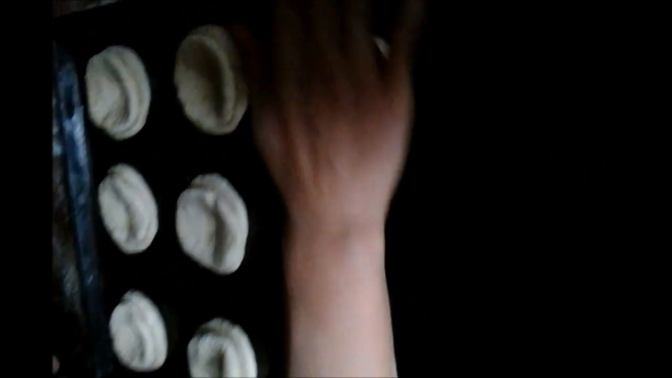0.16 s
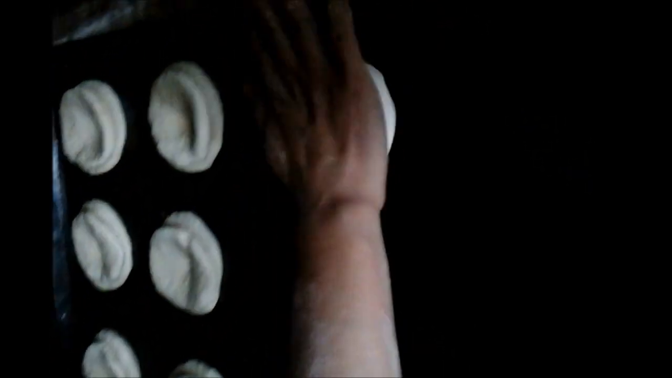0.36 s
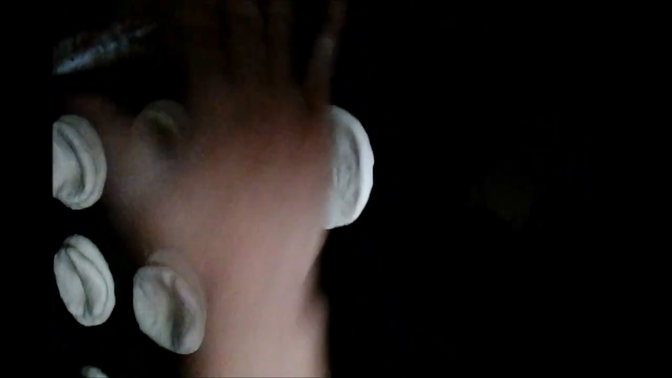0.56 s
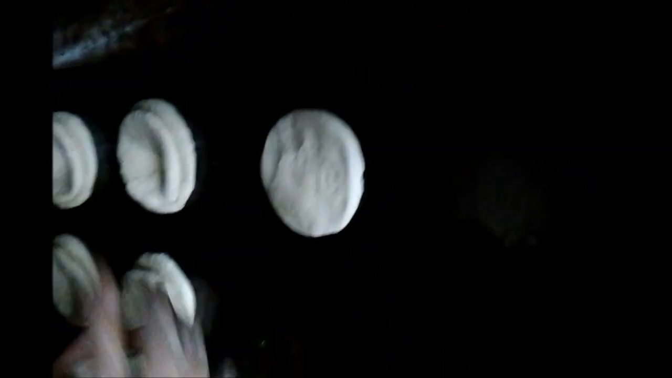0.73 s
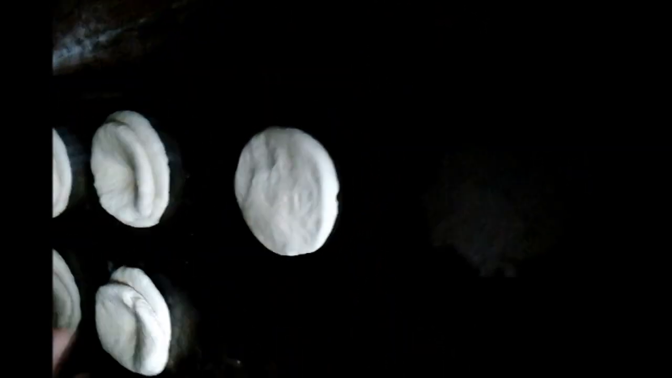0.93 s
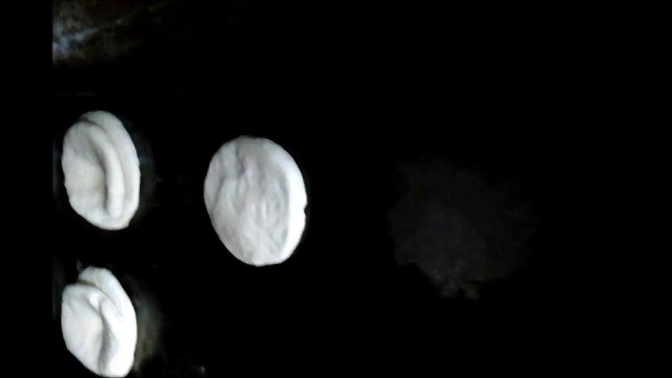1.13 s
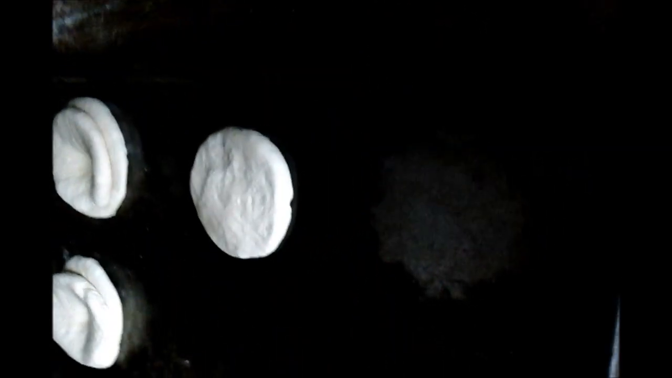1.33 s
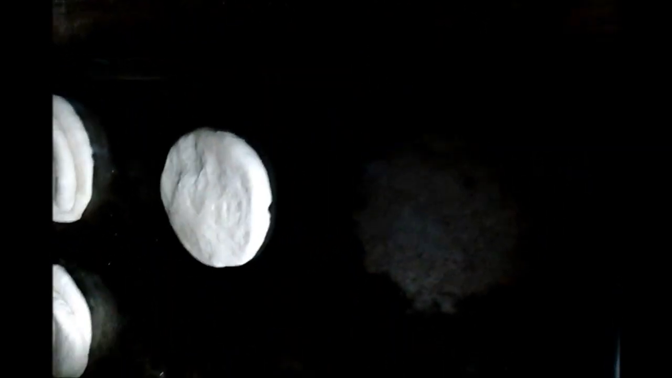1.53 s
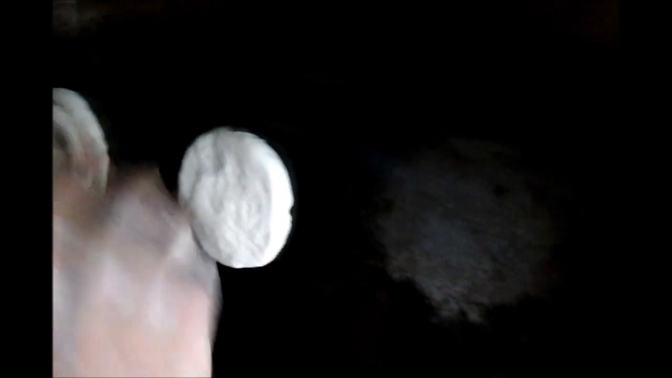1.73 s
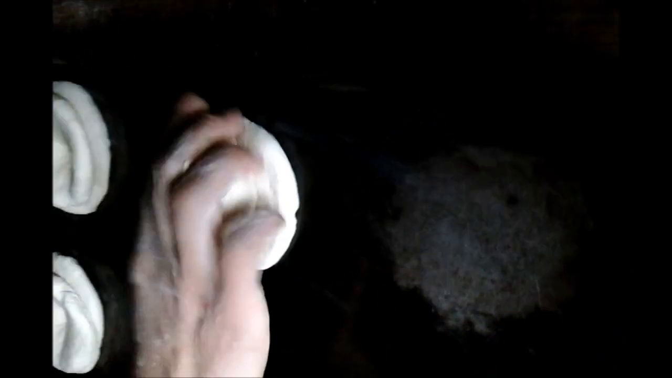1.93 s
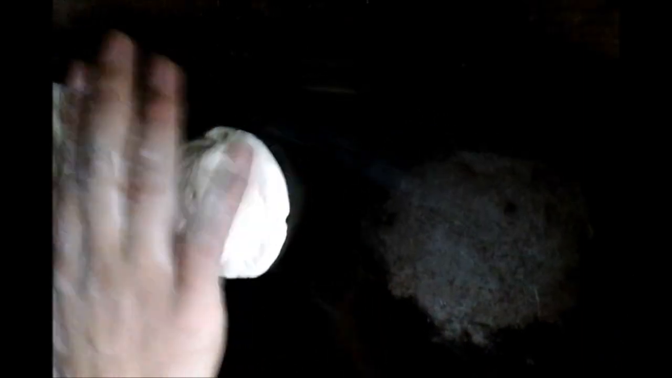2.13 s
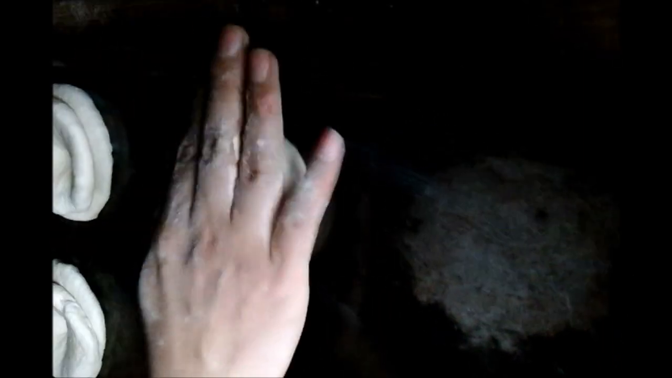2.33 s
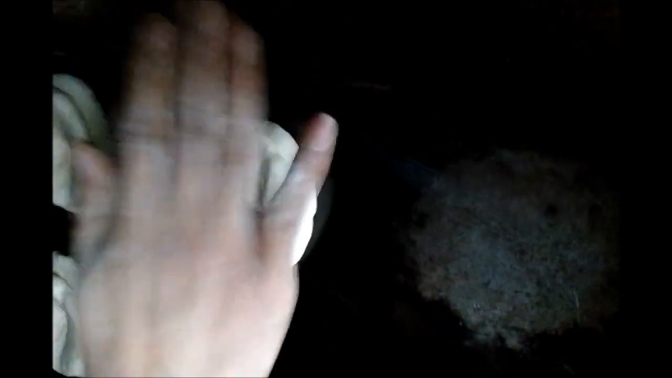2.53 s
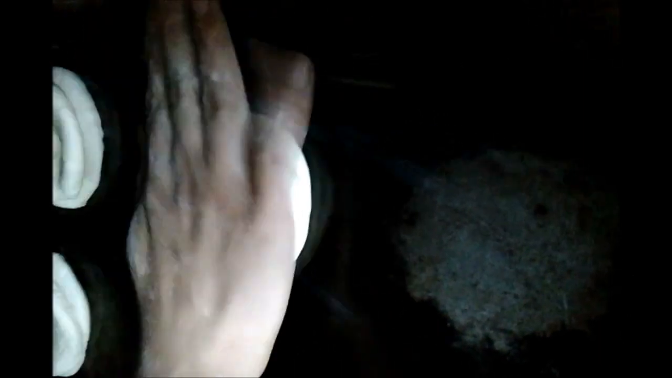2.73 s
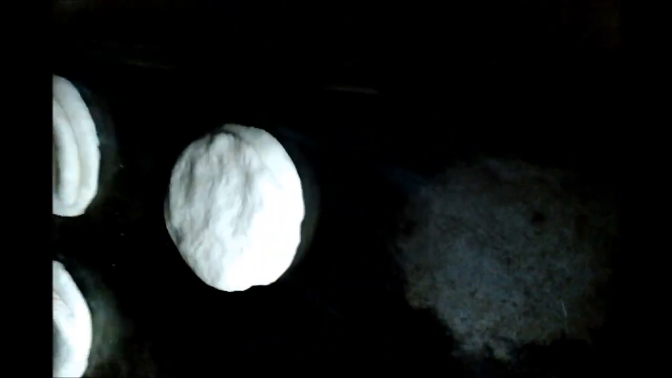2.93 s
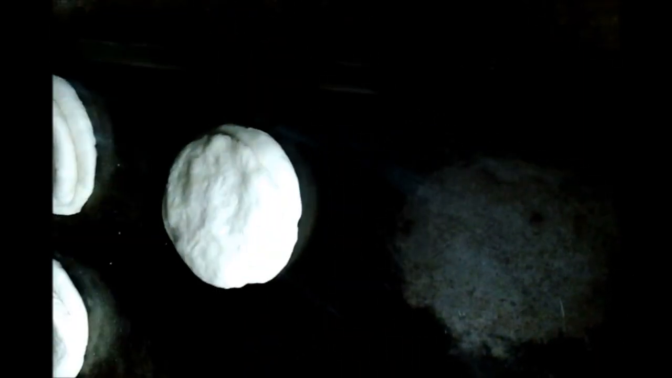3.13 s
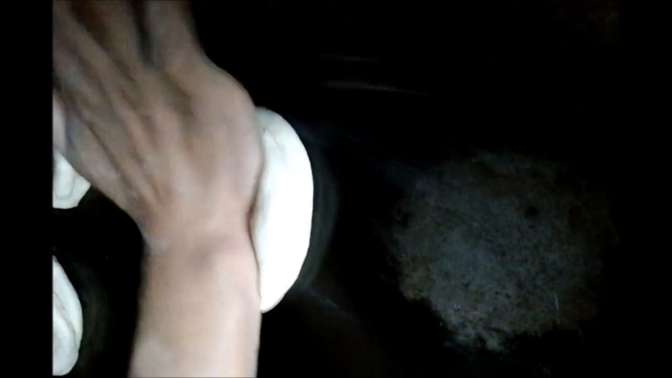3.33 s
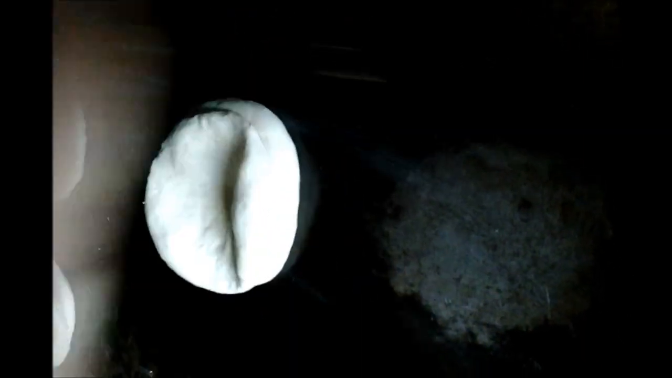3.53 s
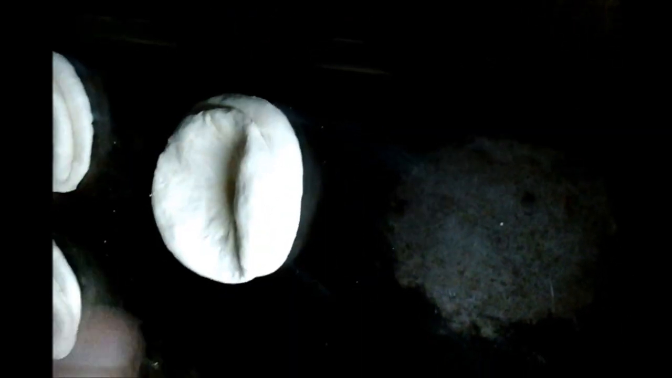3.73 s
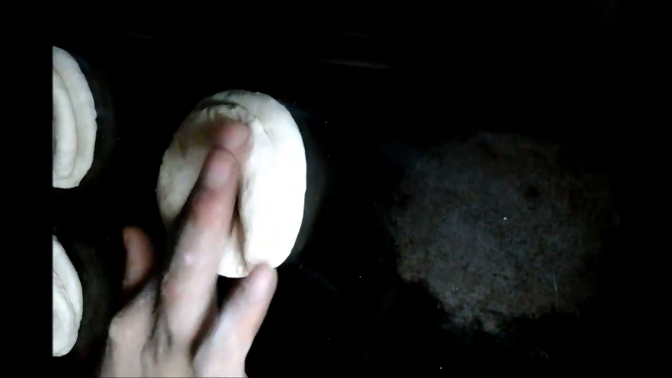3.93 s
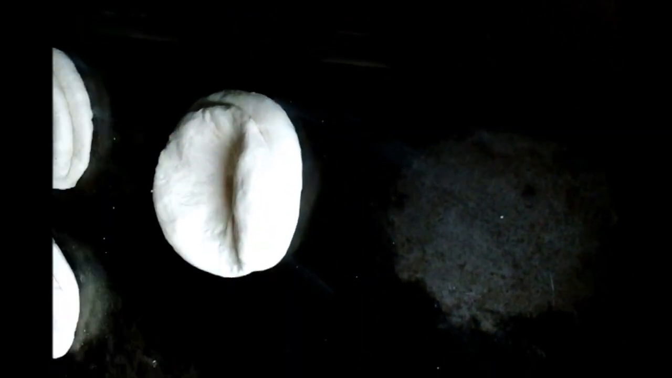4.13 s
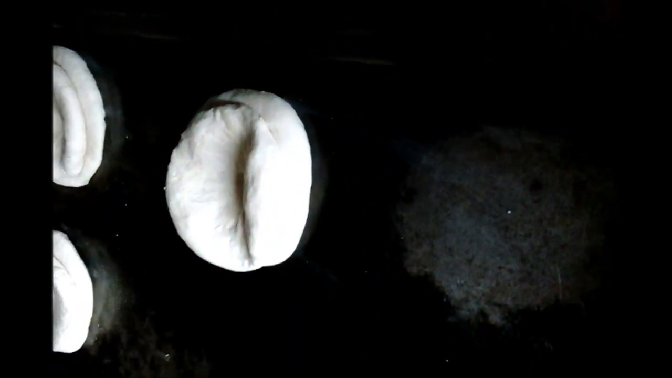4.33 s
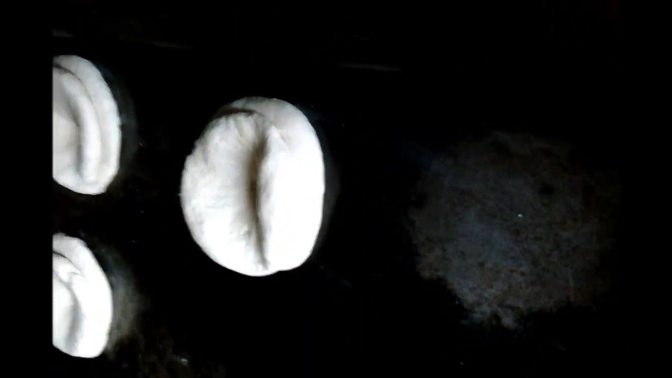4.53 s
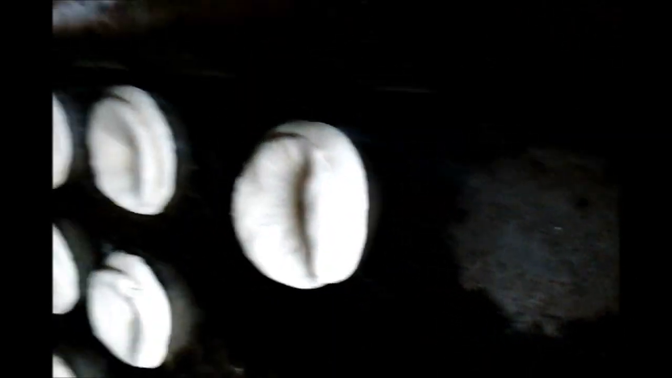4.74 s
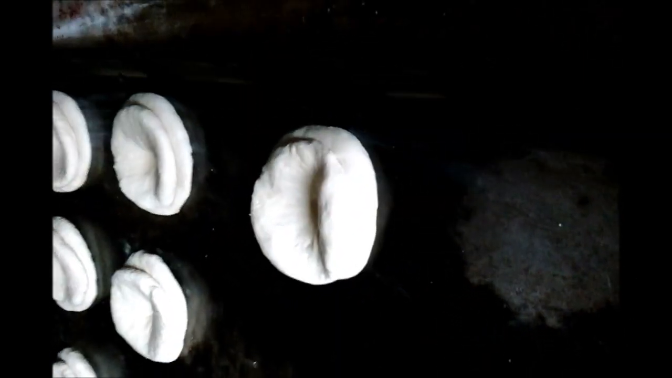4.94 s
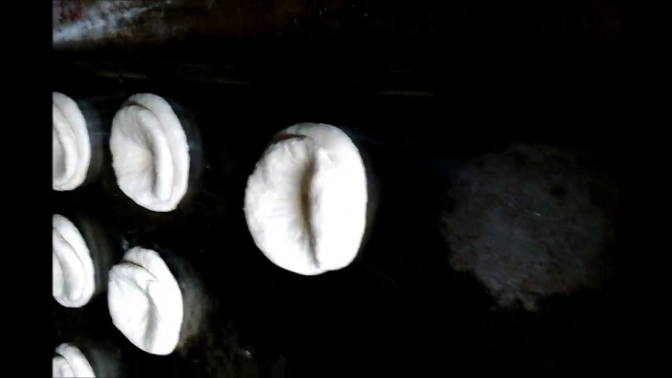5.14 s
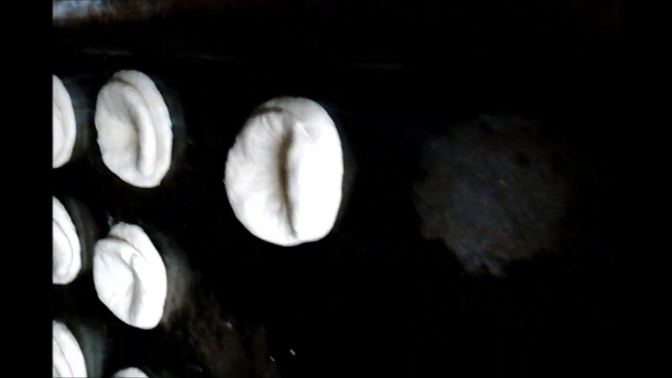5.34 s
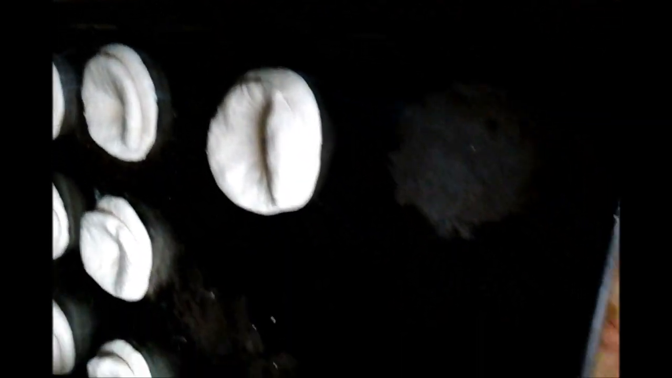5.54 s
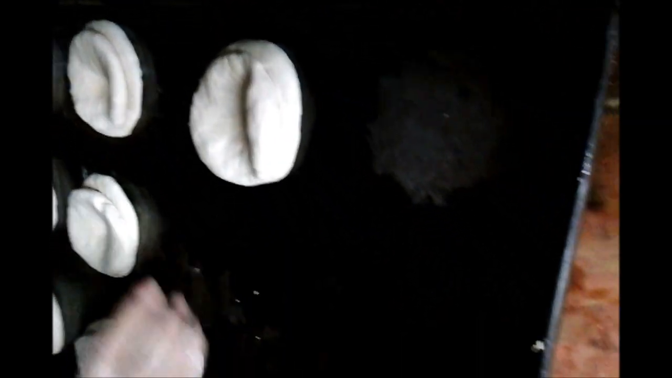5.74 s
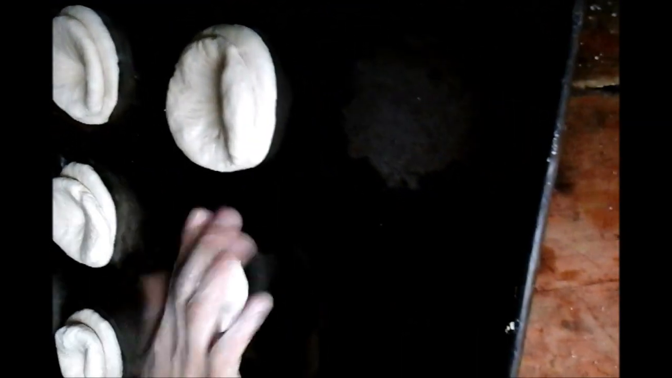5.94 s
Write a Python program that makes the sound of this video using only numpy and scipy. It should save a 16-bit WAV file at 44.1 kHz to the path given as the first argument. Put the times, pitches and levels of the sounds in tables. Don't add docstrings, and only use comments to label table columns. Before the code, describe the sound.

Soft dough is pressed and slapped on sheet metal, heard very close in stereo over a quiet, steady room hum. Light pats and finger rustle come first, then a near-quiet stretch, a firm slap, and a very loud, slightly clipped burst of knocks. A run of muffled pats fades into faint scraping and a small closing knock.

```python
import sys
import numpy as np
from scipy import signal
from scipy.io import wavfile
from scipy.ndimage import uniform_filter1d

SR = 44100
rng = np.random.default_rng(int(sys.argv[2]) if len(sys.argv) > 2 else 0)


def voltage_ratio(level):
    return 10 ** (np.asarray(level, float) / 20)


def to_wav(s):
    ch = np.atleast_2d(s).T
    pcm = np.round(np.clip(ch, -1, 1) * 32767)
    wavfile.write(sys.argv[1], SR, pcm.astype(np.int16))


N = 263718

# (time [s], peak [dB], hardness [dB], weight [dB])
PATS = [(0.054, -24.5, -1.5, -26), (0.169, -34, -13, -15), (0.256, -47, -15, -15), (0.4073, -23.5, -1, 0),
        (0.451, -41, -20, -8), (0.621, -29.5, -12, -2), (0.785, -31.5, -17, -4), (0.97, -32.5, -8, -2),
        (1.96, -34, -33, -3), (2.132, -47.5, -26.5, -13), (2.245, -52, -20, 0), (2.539, -57, 11.5, -8),
        (2.673, -27, -3.5, -6), (3.22, -28.5, -8, -9), (3.567, -17.5, 2.5, -13), (3.646, -27.5, -9, -21),
        (3.767, -21.5, -1, -19), (3.909, -34.5, -22, 4), (3.965, -27.5, -11, -8), (4.117, -23, 0.5, -17.5),
        (4.188, -27.5, -1, -2), (4.309, -29.5, -10, 0), (4.379, -31.5, -15, -24.5), (4.458, -34, -20, 4),
        (4.521, -39.5, -11, 7), (4.586, -55, 6, -0.5), (4.883, -45.5, -16, 0)]
# (frequency [Hz], side over mid [dB])
NEAR_WIDTH = [(60, 8), (110, 15), (200, 16), (370, 4.5), (680, 0), (1240, -2.5), (2280, 0), (4170, -0.5),
              (7650, -1), (14000, 0.5)]


def evened(x):
    return x / np.sqrt(np.mean(x ** 2) + 1e-20)


def read(points, hz):
    f, value = np.transpose(points)
    return np.interp(np.log(hz + 1), np.log(f + 1), value)


def add(mix, s, sound):
    part = mix[:, round(s * SR):][:, :sound.shape[1]]
    part += sound[:, :part.shape[1]]


def panned(pan_db):
    return voltage_ratio(np.array([[pan_db / 2], [-pan_db / 2]]))


def one_pole(x, hz):
    r = np.exp(-2 * np.pi * hz / SR)
    return signal.lfilter([1 - r], [1, -r], x)


def causal(db):
    log_gain = np.log(voltage_ratio(np.maximum(np.r_[db, db[-2:0:-1]], -100)))
    return np.fft.ifft(np.exp(np.conj(signal.hilbert(log_gain)))).real[:len(db)]


def pair(x, colour, wide, peaks=()):
    hz = np.fft.rfftfreq(8192, 1 / SR)
    db = read(colour, hz)
    for f, width, peak_db in peaks:
        db = db + 0.34 * (peak_db + 18.0) / (1 + ((hz - f) / (1.56 * width)) ** 2)
    mid, side = causal(db), causal(db + read(wide, hz))
    taps = np.array([mid, side]) / np.linalg.norm(mid)
    mid, side = signal.oaconvolve(x, taps, axes=1)[:, :N]
    return np.array([mid + side, mid - side])


def blow(noise, contact, ring_db, t60, spike, abrupt=1.0):
    t = np.arange(noise.shape[1]) / SR
    ring = voltage_ratio(ring_db - 60 * t / t60) + voltage_ratio(ring_db - 7.0 - 60 * t / (1.47 * t60))
    scramble = np.exp(-(t / contact) ** abrupt)
    sound = noise * (scramble + ring * (1 - np.exp(-t / 0.0036)))
    sound[:, 0] += spike
    return sound


def tone(hz, level, pan_db=0):
    turn = 2 * np.pi * np.cumsum(hz) / SR
    side = voltage_ratio(read(NEAR_WIDTH, hz) - 2)
    return level * (np.sin(turn) + side * np.cos(turn) * [[1], [-1]]) * panned(pan_db)


def bakery():
    # (frequency [Hz], density [dB per Hz])
    room_colour = [(12, -60), (20, 1.5), (54, -7), (158, 7), (197, 0), (282, 5), (426, -1), (1120, -5.5),
                   (1830, -11), (3090, -13.5), (4430, -14.5), (5830, -11.5), (7680, -13.5), (13300, -14.5),
                   (14500, -16)]
    # (frequency [Hz], side over mid [dB])
    room_width = [(60, 17), (110, 10), (200, 11), (370, 3), (680, 1), (1240, -1.5), (2280, 2), (4170, -0.5),
                  (7650, 0), (14000, -1)]
    swell = evened(uniform_filter1d(rng.standard_normal(N), 6000))
    noise = rng.standard_normal((2, N)) * voltage_ratio(0.8 * swell)
    return voltage_ratio(-60.5) * pair(noise, room_colour, room_width)


def touch(s, press, lift, db):
    t = np.arange(N) / SR - s
    return voltage_ratio(db - 16.5 * np.maximum(-t / press, t / lift))


def brush():
    # (firmest touch [s], press [s], lift [s], level [dB], dull drag over hiss [dB])
    sweeps = [(0.13, 0.15, 0.089, -43, -9), (0.47, 0.31, 0.17, -45, -8), (0.75, 0.16, 0.21, -51.5, -10.5),
              (0.87, 0.015, 0.17, -50.5, -6), (1.06, 0.08, 0.098, -51, -2), (1.12, 0.015, 0.06, -50.5, -15),
              (1.4, 0.12, 0.16, -57, -5), (1.6, 0.13, 0.66, -60.5, -22), (1.99, 0.06, 0.086, -52.5, -14),
              (2.11, 0.018, 0.02, -61, -13), (2.42, 0.27, 0.33, -56, -9), (2.57, 0.064, 0.063, -55, -4),
              (3.24, 0.024, 0.15, -59.5, 5), (3.55, 0.61, 0.18, -48.5, -5), (3.95, 0.24, 0.17, -57.5, -4.5),
              (4.21, 0.032, 0.37, -50.5, -3), (4.56, 0.13, 0.3, -49.5, -3),
              (5.62, 0.058, 0.52, -51.5, -7.5), (5.84, 0.05, 0.12, -53.5, -8.5)]
    # (firmest touch [s], press [s], lift [s], level [dB], dull drag over hiss [dB])
    scrapes = [
        (0.84, 0.11, 0.024, -54.5, 2),
        (4.8, 0.027, 0.09, -51.5, -10),
        (4.961, 0.08, 0.38, -50, -2),
        (5.22, 0.36, 0.26, -54.5, 4),
        (5.61, 0.02, 0.06, -50.5, -26),
        (4.888, 0.012, 0.037, -49, -4),
        (5.184, 0.008, 0.044, -51.5, -12),
        (5.241, 0.008, 0.1, -49.5, -16),
    ]
    # (frequency [Hz], density [dB per Hz])
    hiss_colour = [(880, -22.5), (1500, -11), (2150, -10), (2360, -7), (3760, -6), (4550, -5.5),
                   (5930, 3.5), (7450, -9), (14500, -25)]
    drag_colour = [(88, -40), (150, -25), (299, -12), (487, -0.5), (574, -6), (1410, -7), (3000, -18.5),
                   (3900, -60.5), (6600, -120)]
    puffs = [(s + 0.0018, 0.008, 0.056, db - 33, 6.5) for s, db, *_ in PATS]
    strokes = [(row, -19) for row in sweeps + puffs] + [(row, 9) for row in scrapes]
    power = 0
    for (s, press, lift, db, drag_db), nail_db in strokes:
        shares = voltage_ratio(np.array([[0], [drag_db], [nail_db]]))
        power = power + (touch(s, press, lift, db) * shares) ** 2
    hiss_level, drag_level, nail_level = np.sqrt(power)

    lumps = evened(uniform_filter1d(rng.standard_normal(N), 500))
    grains = voltage_ratio(1.6 * np.minimum(rng.exponential(1, N), 5)) * (rng.random(N) < 900 / SR)
    grains = evened(signal.lfilter([1], [1, -0.97], grains))
    hiss, nail = rng.standard_normal((2, 2, N)) * voltage_ratio(1.45 * lumps) * (0.62 + 0.12 * grains)
    nail = nail * nail_level * voltage_ratio(1.0 + 2.1 * lumps[::-1])
    nail = signal.lfilter(*signal.iirpeak(3650, 6.5, SR), nail)
    drag = rng.standard_normal((2, N)) * drag_level * voltage_ratio(0.7 * lumps)
    bright = voltage_ratio(-0.5) * pair(hiss * hiss_level + nail, hiss_colour, NEAR_WIDTH)
    return bright + pair(drag, drag_colour, NEAR_WIDTH)


def knocks():
    # (time [s], peak [dB], contact [s], share of ring [dB], left over right [dB])
    rim_hits = [
        (0.3861, -23, 0.0028, -13, -1),
        (2.8214, -35, 0.0065, -11, 7),
        (3.3056, -4.5, 0.0048, -23, 5),
        (3.322, -10, 0.0041, -7.5, 2.5),
        (3.3575, -5, 0.00227, -19.5, -4),
        (3.362, -20.5, 0.081, -7, 2),
        (3.446, -23.5, 0.012, -15, -2.5),
        (5.9442, -26.5, 0.0043, -14, 10),
        (5.9486, -19, 0.0072, -9, -2.5),
    ]
    # (time [s], peak [dB], contact [s], share of ring [dB], left over right [dB])
    skin_smacks = [
        (0.044, -27, 0.0044, -9.5, -5),
        (0.367, -27, 0.0036, -12.5, 5),
        (0.45, -29, 0.017, -12, 3),
        (0.8634, -29.5, 0.004, -32, 1),
        (2.7598, -25, 0.0045, -3, 0),
        (2.765, -14.5, 0.0051, -15.5, -3),
        (3.2977, -15, 0.0069, -11, 8),
        (3.3252, -5, 0.0029, -21, -9),
        (3.511, -23, 0.0053, -21, 6),
        (4.941, -40, 0.011, -7.5, -11),
    ]
    # (time [s], peak [dB], share of ring [dB], left over right [dB])
    nail_ticks = [(0.5609, -34.5, -17, -1), (0.8984, -44, -23, -6), (1.066, -35, -16, -1),
                  (1.119, -44.5, -7, 5), (1.3136, -48, -6, 2), (1.4035, -45, -9, -2), (1.958, -45, -13, -4),
                  (2.0134, -36, -22, -5), (2.287, -46, -25, -11), (2.364, -47.5, -18, -8),
                  (2.573, -38.5, -16, 0), (3.2424, -53, -18, -12), (3.953, -36, -19, 0),
                  (4.2, -40.5, 0.5, -4), (4.528, -41, -12, -11), (4.792, -46, -14, -4.5),
                  (5.6038, -42, -11, -8), (5.836, -47, -8, -5.5)]
    # (frequency [Hz], density [dB per Hz])
    burst_colour = [(180, -21.5), (300, -14), (768, 1.5), (949, 0.5), (1060, 5), (1150, 3), (2210, -2),
                    (2550, -4), (4020, -3.5), (5740, 2), (14500, -29.5)]
    hits = [(*row, 2, 1 / SR) for row in rim_hits]
    hits += [(*row, -5, 0.0016) for row in skin_smacks]
    hits += [(s, db, 0.0045, ring_db, pan_db, -7, 0.0016) for s, db, ring_db, pan_db in nail_ticks]
    mix, t = np.zeros((2, N)), np.arange(20000) / SR
    noise = rng.standard_normal((len(hits), 2, 20000))
    for (s, db, contact, ring_db, pan_db, body_db, swell), z in zip(hits, noise):
        hit = blow(z, contact, ring_db, t60=0.28, spike=0.62, abrupt=1.33)
        rattle = evened(uniform_filter1d(z[0, ::-1], 130))
        hit = hit * voltage_ratio(1.5 * rattle) * np.minimum((t + 1 / SR) / swell, 1)
        body = hit - signal.lfilter(*signal.butter(3, 3400, "high", fs=SR), hit)
        pocket = signal.lfilter(*signal.iirpeak(4720, 3.5, SR), hit)
        hit = hit + (1 - voltage_ratio(min(body_db, 0))) * pocket
        air = hit - signal.filtfilt(*signal.butter(4, 9600, fs=SR), hit)
        hit = hit + (voltage_ratio(body_db) - 1) * body
        hit = hit - air * (1 - voltage_ratio(-220 * t))
        left, right = hit * panned(pan_db)
        add(mix, s, voltage_ratio(db - 6.5) * np.array([left + right, left - right]))
    return voltage_ratio(-5.5) * pair(mix, burst_colour, NEAR_WIDTH)


def snaps():
    # (time [s], level [dB], left over right [dB])
    crust_snaps = [(0.0451, -46, 2), (0.3673, -45, 4), (0.737, -46, 0), (0.8638, -46, 1), (0.8984, -54, -4),
                   (1.314, -44, 5), (2.765, -40, 2), (2.822, -38, 0), (3.2985, -36, 0), (3.307, -35, 0),
                   (3.3225, -37, 0), (3.3583, -23, 4), (3.511, -40, -2), (5.953, -35, 0)]
    mix, t = np.zeros((2, N)), np.arange(1500) / SR
    band = signal.butter(2, [7500, 12500], "band", fs=SR)
    for (s, db, pan_db), z in zip(crust_snaps, rng.standard_normal((len(crust_snaps), 2, 1500))):
        burst = (z + 0.5 * z[::-1]) * np.exp(-t / 0.0029)
        add(mix, s, voltage_ratio(db) * panned(pan_db) * signal.lfilter(*band, burst))
    return mix


def thumps():
    # (time [s], peak [dB], share of ring [dB], hardness [dB], weight [dB])
    slaps = [(0.81, -38.5, -10.5, 2.5, 10), (1.053, -49, 1, 6, -9), (2.434, -33, -12.5, -21, 14),
             (2.608, -22.5, -9, 0, -19), (2.774, -14, -7.5, 3.5, -4), (2.8065, -24, -11.5, 2, 11.5),
             (2.872, -27, -6.5, -9.5, -16), (2.887, -39, -14, -7, -0.5), (3.03, -32, -7.5, -3.5, 4),
             (3.284, -35, 1, -48, -10), (3.301, -20.5, -4.5, 12, 12.5), (3.322, -18, -1, -10, -5),
             (3.361, -29, -6, 16, 15), (3.376, -26, -10.5, 7, 13.5), (3.447, -37, -6, -3, -1),
             (3.711, -25, -11, -25, -12), (4.032, -53, 5, 2, -6), (4.941, -37.5, -2.5, -9, -4),
             (5.947, -39, -1, 10.5, 6)]
    # (frequency [Hz], density [dB per Hz])
    thump_colour = [(18, -22.5), (30, -30), (253, -2.5), (315, -6), (397, -6.5), (655, -2.5), (1970, -15.5),
                    (2410, -15), (2870, -23), (5800, -26.5), (8450, -48), (12000, -52), (15600, -82),
                    (22000, -120)]
    side_colour = [(18, -57), (30, -15), (417, 7), (608, -5), (954, -7.5), (1320, -20.5), (1880, -15.5),
                   (3260, -28.5), (5660, -24.5), (8450, -104), (12000, -85), (15600, -113), (22000, -120)]
    # (frequency [Hz], width [Hz], level [dB])
    sheet_peaks = [(246, 21, -24.5), (525, 7.9, 0.5), (600, 10, -14.5), (1020, 47, -2.5), (1403, 115, -4),
                   (2413, 31, -10)]
    blows = slaps + [(s, db - 1, -6.5, hard_db, weight_db) for s, db, hard_db, weight_db in PATS]
    mix, t = np.zeros((2, N)), np.arange(20000) / SR
    noise = rng.standard_normal((len(blows), 2, 2, 20000))
    for (s, db, ring_db, hard_db, weight_db), (low, high) in zip(blows, noise):
        push = blow(1.045 * low, contact=0.0041, ring_db=ring_db, t60=0.21, spike=9.4)
        push[:, round(0.0011 * SR)] -= 8
        smack = blow(high, contact=0.0047, ring_db=ring_db - 10.5, t60=0.27, spike=0.35)
        smack = smack - one_pole(smack, hz=1266)
        soft = one_pole(one_pole(push, hz=1880), hz=1880)
        dull = one_pole(one_pole(soft, hz=810), hz=810)
        soft = dull + (soft - dull) * (0.5 + 0.48 * np.exp(-t / 0.03))
        heavy = blow(low, contact=0.0075, ring_db=ring_db, t60=0.33, spike=4.7)
        heavy = one_pole(one_pole(heavy, hz=176), hz=176)
        thump = soft + voltage_ratio(hard_db + 4.5) * smack + voltage_ratio(weight_db + 2.0) * heavy
        add(mix, s + 0.003, voltage_ratio(db) * thump)
    hz = np.geomspace(20, 20000, 60)
    wide = np.transpose([hz, 3 + read(side_colour, hz) - read(thump_colour, hz)])
    return voltage_ratio(-6.5) * pair(mix, thump_colour, wide, sheet_peaks)


def pat_rings():
    # (delay [s], frequency [Hz], level under the pat [dB], t60 [s])
    patches = [
        (0.002, 510, -7.5, 0.041),
        (0.002, 1460, -17.5, 0.04),
        (0.0045, 1030, -11.5, 0.045),
        (0.006, 208, -20, 0.093),
        (0.01, 697, -17, 0.13),
        (0.002, 2350, -25, 0.03),
    ]
    mix, t = np.zeros((2, N)), np.arange(6000) / SR
    luck = rng.standard_normal((len(PATS), len(patches)))
    for (delay, hz, db, t60), z in zip(patches, luck.T):
        level = voltage_ratio(db - 60 * t / t60) * (1 - np.exp(-t / 0.001))
        ring = tone(hz * (1 + 0.054 * np.exp(-t / 0.011)), level)
        for (s, pat_db, hard_db, _), v in zip(PATS, z):
            add(mix, s + delay, ring * voltage_ratio(pat_db + 2 * v + 0.15 * hard_db * np.log2(hz / 500)))
    return mix


def hums():
    # (time [s], peak [dB], frequency [Hz], t60 [s])
    free_patches = [(0.062, -43, 696, 0.19), (0.3865, -27, 1046, 0.032), (0.412, -34, 805, 0.062),
                    (0.449, -37, 792, 0.11), (0.505, -48, 853, 0.1), (2.438, -49, 600, 0.1),
                    (2.612, -46, 545, 0.08), (2.78, -30.5, 814, 0.09), (3.306, -21.5, 1070, 0.11),
                    (3.578, -36, 673, 0.13), (2.439, -46, 1085, 0.05), (4.943, -39, 666, 0.09),
                    (4.956, -39, 420, 0.092), (5.9495, -23, 1048, 0.055)]
    mix, t = np.zeros((2, N)), np.arange(9000) / SR
    for (s, db, hz, t60), z in zip(free_patches, rng.standard_normal((len(free_patches), 9000))):
        waver_db = 2.0 * evened(uniform_filter1d(z, 300))
        level = voltage_ratio(db - 60 * t / t60 + waver_db) * (1 - np.exp(-t / 0.0021))
        sag = 0.083 * (1 - 2 * np.exp(-t / 0.02))
        add(mix, s, tone(hz * (1 - sag), level))
    return mix


def pops():
    # (time [s], peak [dB], frequency [Hz], length [s], left over right [dB])
    air_pockets = [(0.37, -38, 5000, 0.0034, -2), (0.394, -34.5, 5200, 0.002, 3),
                   (0.4535, -34, 5530, 0.0025, 0), (2.7653, -19.5, 4610, 0.0036, -6),
                   (2.82, -35, 5330, 0.005, -4), (3.3038, -10, 2714, 0.003, -1),
                   (3.325, -8.5, 5830, 0.0036, 0), (3.357, -14.5, 5800, 0.0025, 2),
                   (3.393, -26.5, 6200, 0.016, -5), (3.509, -33, 5650, 0.0057, -3),
                   (5.9516, -25, 5670, 0.0037, -3)]
    mix = np.zeros((2, N))
    for (s, db, hz, length, pan_db), z in zip(air_pockets, rng.standard_normal((len(air_pockets), 2000))):
        u = np.minimum(np.arange(2000) / SR / length, 1)
        rough = 1 + 0.38 * evened(uniform_filter1d(z, 7))
        shape = np.sqrt(np.abs(np.sin(np.pi * u))) * rough
        climb = 0.24 * 0.0041 / max(length, 0.004) * (u - 0.5)
        add(mix, s, tone(hz * (1 + climb), voltage_ratio(db) * shape, pan_db))
    return mix


def sways():
    # (time [s], length [s], level [dB], frequency [Hz])
    air_pushes = [
        (1.62, 0.25, -65, 53.4),
        (4.853, 0.25, -49, 50.4),
        (5.258, 0.24, -57, 54.3),
        (5.454, .22, -54, 55.9),
    ]
    mix = np.zeros((2, N))
    for s, length, db, hz in air_pushes:
        t = np.arange(0, length, 1 / SR)
        push = np.sin(np.pi * t / length) ** 2 * np.sin(2 * np.pi * hz * t)
        add(mix, s, voltage_ratio(db) * push * [[1.2], [-1]])
    return mix


def scene():
    return (bakery() + brush() + knocks() + snaps() + thumps() + pat_rings() + hums() + pops()
            + sways())


def low_pass(x):
    return signal.sosfilt(signal.butter(12, 14620, fs=SR, output="sos"), x)


def record(dry):
    # (frequency [Hz], left over right [dB])
    port_colour = [(60, 0), (110, -0.5), (200, 3.5), (370, -1.5), (680, 3), (1240, -0.5), (2280, 1),
                   (4170, -2.5), (7650, -3.5), (14000, 4)]
    half_db = read(port_colour, np.fft.rfftfreq(1024, 1 / SR)) / 2
    taps = np.array([causal(half_db), causal(-half_db)])
    ports = signal.oaconvolve(dry, taps, axes=1)[:, :N]
    ports = signal.oaconvolve(ports, signal.firwin(255, 14700, fs=SR)[None], "same")
    return low_pass(np.clip(ports, -1, 1))


dry = scene()
out = record(dry)
to_wav(out)
```